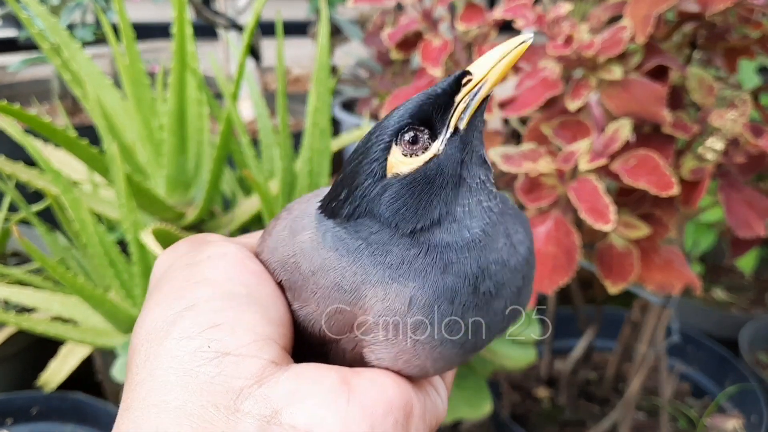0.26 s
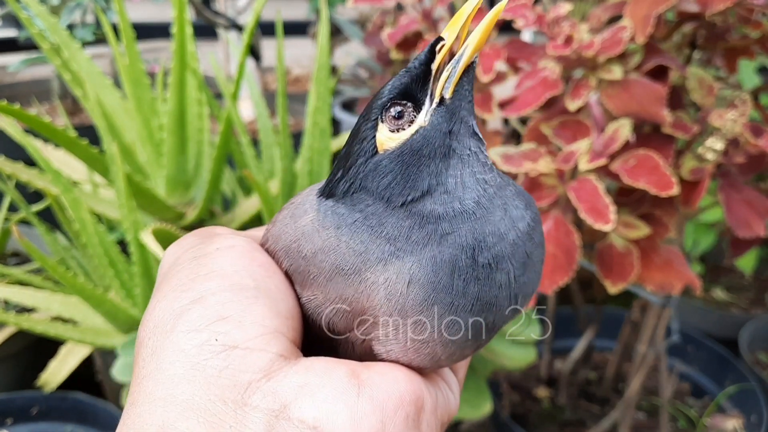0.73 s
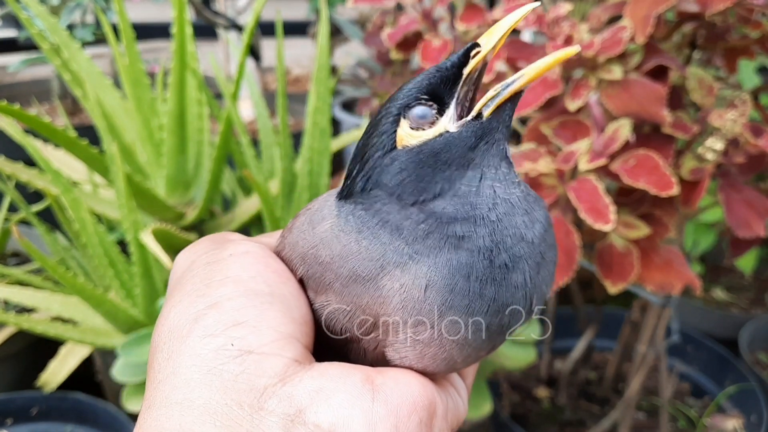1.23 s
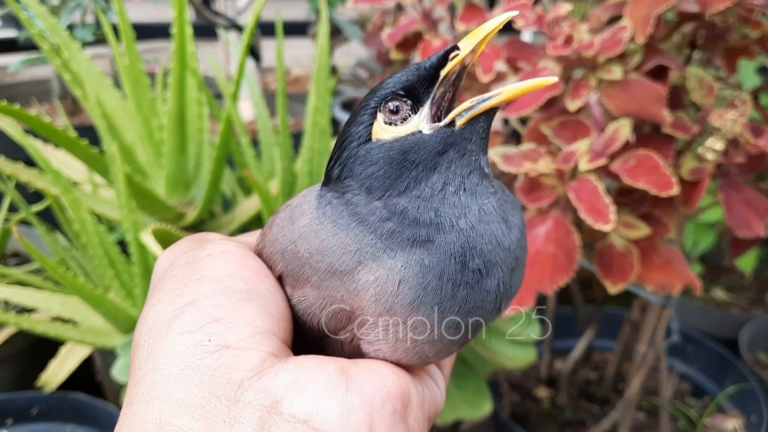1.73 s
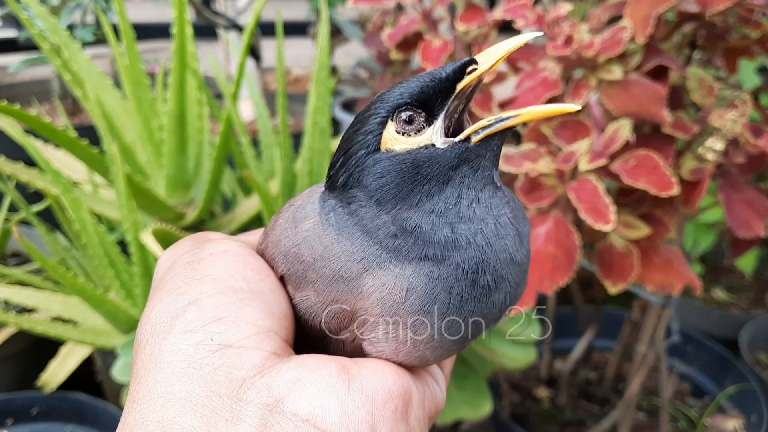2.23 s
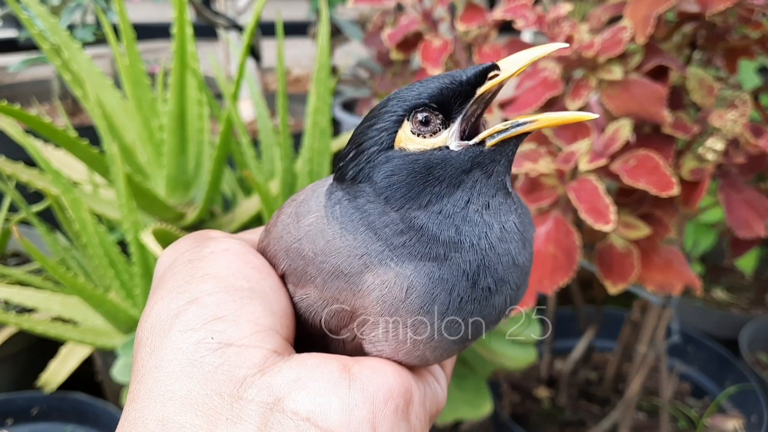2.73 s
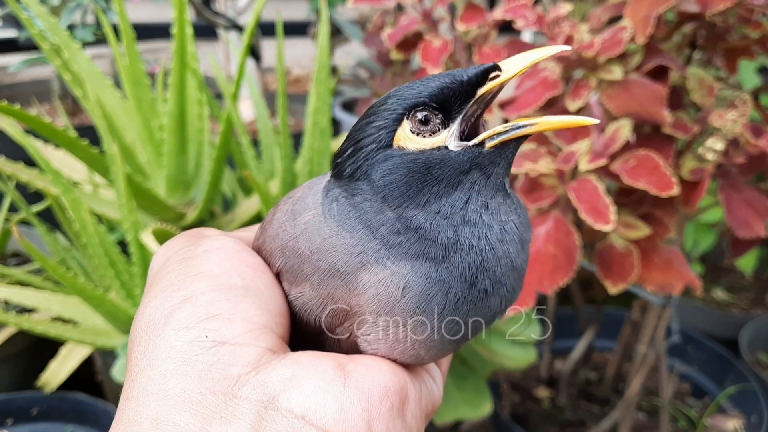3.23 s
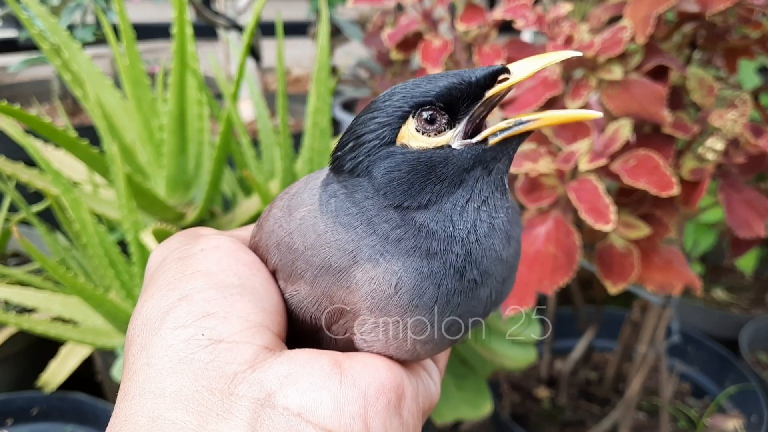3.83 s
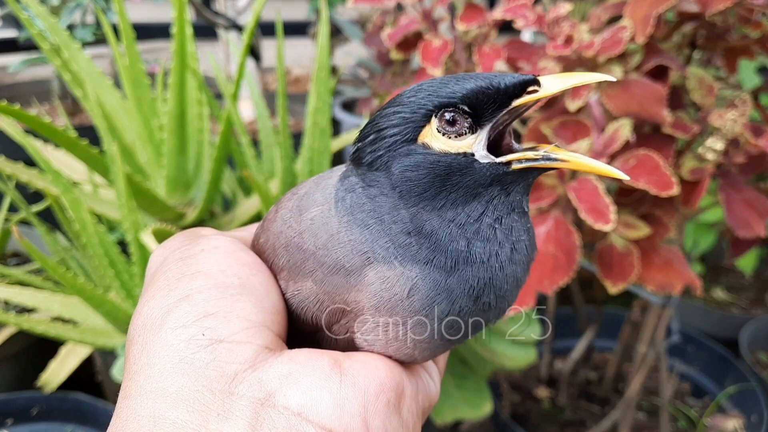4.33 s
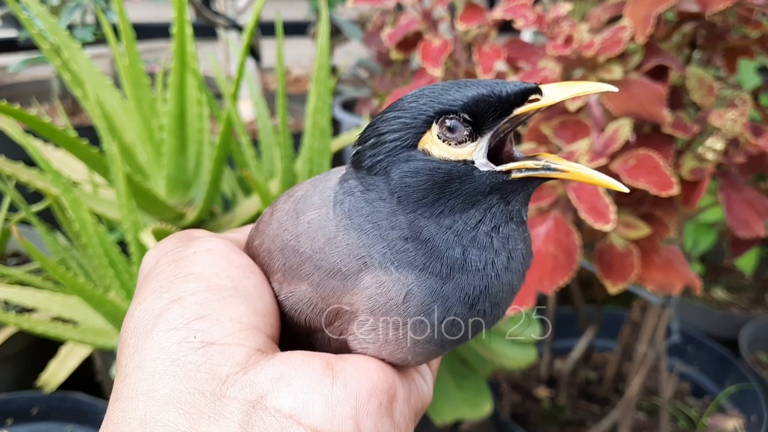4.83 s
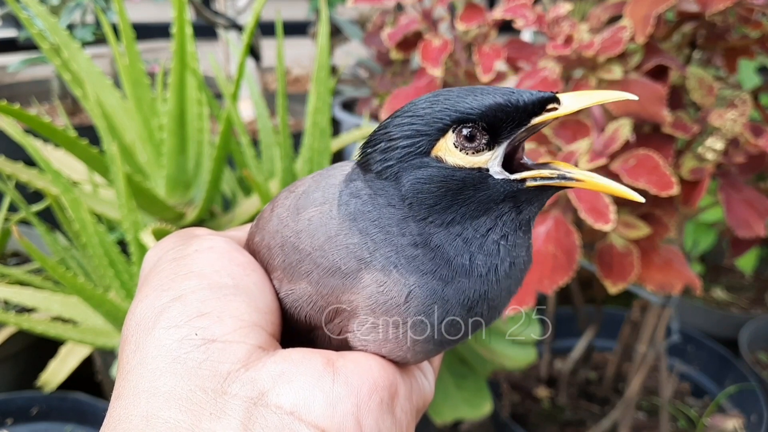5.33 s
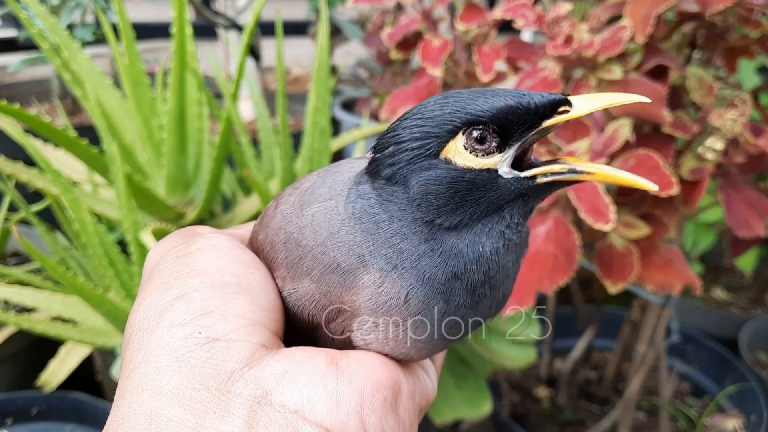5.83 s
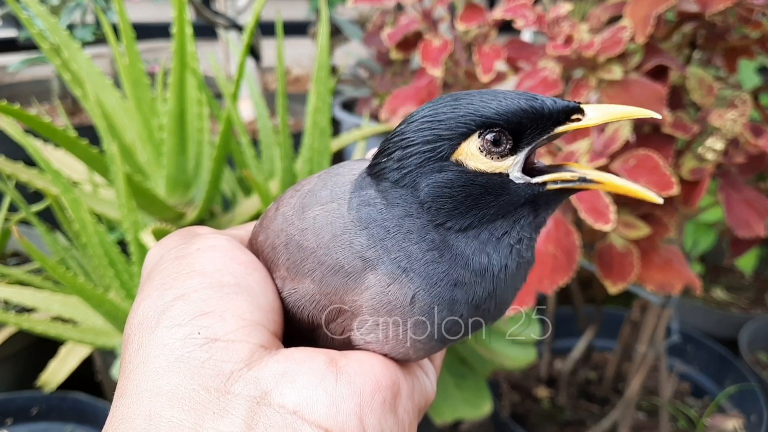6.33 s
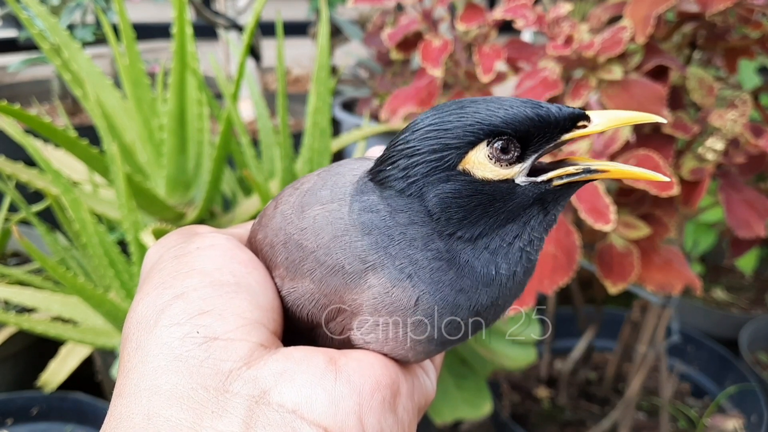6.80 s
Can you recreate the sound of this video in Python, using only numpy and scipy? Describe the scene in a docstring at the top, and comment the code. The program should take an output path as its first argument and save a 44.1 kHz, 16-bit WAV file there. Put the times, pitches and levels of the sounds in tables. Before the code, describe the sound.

A hand-held myna calls right at the microphone in a garden. After a brief tick of fingers on feathers, it gives quick squeals, croaks and warbles, then alternates triple clucks with yodel-like notes. Seven even, high peeps follow, then two lower calls and a few last slurs and clucks. Thin hisses fall between calls, over a faint rumble of distant traffic.

```python
"""A hand-held myna in a garden

The bird calls right at a phone: squeals, warbles, clucks, yodels and a run of peeps. Its syrinx, the
source, repeats a few syllable shapes; its throat, the filter, rings near 3 kHz. The sound turns rough
and hissy on fast glides. Between calls the bird hisses and whistles thinly. Fingers brush its
feathers, and walls reflect the sound faintly over a distant rumble."""
import sys
import numpy as np
from scipy import signal
from scipy.fft import rfft, irfft, next_fast_len
from scipy.io import wavfile
from scipy.ndimage import uniform_filter1d, map_coordinates

SR = 44100
rng = np.random.default_rng(int(sys.argv[2]) if len(sys.argv) > 2 else 0)


def master_out(mix):
    """Clip the mix to full scale and print it as 16-bit PCM to the path in sys.argv[1]."""
    frames = np.transpose(np.atleast_2d(mix))
    ceiling = np.clip(frames, -1, 1)
    pcm = np.round(ceiling * 32767).astype(np.int16)
    wavfile.write(sys.argv[1], SR, pcm)


N = 311346
TIME = np.arange(N) / SR


def undb(db):
    """Amplitude ratio of a level in decibels."""
    return 10 ** (np.asarray(db) / 20)


def unit(x):
    """Normalisation to rms 1."""
    return x / np.sqrt(np.mean(x ** 2) + 1e-18)


def curves(table, t):
    """Linear interpolation of a table's columns at times t."""
    times, *columns = np.transpose(table)
    return [np.interp(t, times, c) for c in columns]


def spectrum(table, hz):
    """Interpolation of a table's columns on a logarithmic frequency axis."""
    f, *columns = np.transpose(table)
    return [np.interp(np.log(hz + 1), np.log(f), c) for c in columns]


def filtered(x, response):
    """Linear filtering: the spectrum of x times a frequency response."""
    size = next_fast_len(x.shape[-1] + 4096)
    return irfft(rfft(x, size) * response(np.fft.rfftfreq(size, 1 / SR)), size)[..., :x.shape[-1]]


def resonance(f, hz, width):
    """Response of a damped resonator, gain 1 at the centre."""
    return 1j * f * width / (hz ** 2 - f ** 2 + 1j * f * width)


def noise(colour, size):
    """Gaussian noise of rms 1, shaped by (f/Hz, level/dB) points."""
    return unit(filtered(rng.standard_normal(size), lambda f: undb(spectrum(colour, f)[0])))


def wander(hz, size):
    """Random fluctuation of rms 1, low-passed at hz."""
    return unit(filtered(rng.standard_normal(size), lambda f: np.exp(-(f / hz) ** 2)))


def gate(t, length, attack, release):
    """Envelope of a linear rise and a linear fall that ends at length."""
    return np.clip(t / attack, 0, 1) * np.clip((length - t) / release, 0, 1)


def clock(length):
    """Sample times of a short event."""
    return np.arange(int(length * SR)) / SR


def add(track, start, x):
    """Superposition of x on the track from start seconds."""
    i = int(start * SR)
    track[i:i + len(x)] += x[:max(len(track) - i, 0)]


# distant traffic: t/s, level/dB
RUMBLE = [(0, -54.5), (.35, -48), (1.2, -59.5), (3.5, -60), (5.1, -59), (5.75, -69.5), (6.45, -70.5),
          (7.06, -57.5)]
# spectra of traffic and air: f/Hz, level/dB
RUMBLE_COLOUR = [(15, -24), (25, -19.5), (62, -2), (102, 0.5), (177, -4), (227, -18.5), (321, -9),
                 (419, -24), (600, -25.5), (780, -70), (1320, -120)]
AIR_COLOUR = [(300, -24.5), (800, -3), (1500, 2), (3000, -3.5), (6000, -2.5), (12000, -17.5),
              (16000, -25.5)]
# far motor: t/s, f/Hz, fundamental level/dB, octave level/dB
MOTOR = [(0, 90, -64, -65.5), (.35, 90.6, -48.5, -52.5), (1.2, 87.6, -60, -79), (2.72, 90, -55.5, -80),
         (2.87, 85.2, -77, -57), (3.65, 80.46, -53, -55), (5.3, 79.9, -78.5, -85.5),
         (7.06, 76.8, -78, -72.5)]


def garden(air_db=-70, side=.4, swell_db=3.0, swell_hz=5):
    """Ambient noise: randomly swelling traffic, two harmonics of a far motor and a faint hiss of air."""
    rumble_db = curves(RUMBLE, TIME)[0] + swell_db * wander(swell_hz, N)
    hz, fundamental_db, octave_db = curves(MOTOR, TIME)
    phase = 2 * np.pi * np.cumsum(hz * (1 + 0.018 * wander(15, N))) / SR
    motor = np.sqrt(2) * (undb(fundamental_db) * np.sin(phase) + undb(octave_db) * np.sin(2 * phase))
    rumble = noise(RUMBLE_COLOUR, N) + side * np.array([[1], [-1]]) * noise(RUMBLE_COLOUR, N)
    air = np.array([noise(AIR_COLOUR, N) for _ in range(2)])
    return undb(rumble_db) * rumble + motor + undb(air_db) * air


# fingers on feathers: t/s, duration/s, level/dB
BRUSHES = [(0.072, 1, -57.5), (0.288, 0.03, -47.5), (0.314, 0.0055, -24), (0.607, 0.022, -48)]
# their spectrum: f/Hz, level/dB
BRUSH_COLOUR = [(290, -44), (500, -17), (1950, 3), (2540, 1), (4030, 1.5), (12700, 3), (16000, 3.5)]
# hand against phone: t/s, duration/s, centre f/Hz, level/dB
BUMPS = [(0.305, 0.041, 111, -43.5), (1.771, 0.081, 110, -47.5)]


def hand():
    """Friction and impact: fingers brush the feathers, with one sharp tick, and bump the phone softly."""
    out = np.zeros(N)
    for start, length, db in BRUSHES:
        t = clock(length)
        friction = undb(db + 2 * wander(40, len(t))) * noise(BRUSH_COLOUR, len(t))
        add(out, start, friction * gate(t, length, length / 4, length / 2))
    for start, length, hz, db in BUMPS:
        t = clock(length)
        thud = filtered(rng.standard_normal(len(t)), lambda f: resonance(f, hz, 2 * hz) ** 2)
        add(out, start, undb(db) * unit(thud * gate(t, length, length / 4, length / 2)))
    return out


# hisses: t/s, duration/s, centre f/Hz, bandwidth/Hz, level/dB
HISSES = [(0.139, 0.13, 1840, 533, -43.5), (0.735, 0.13, 1930, 680, -42.5), (1.116, 0.14, 4150, 2270, -38),
          (1.509, 0.12, 4200, 2200, -41.5), (5.358, 0.3, 3570, 886, -49), (5.914, 0.086, 1836, 700, -53.5)]
# whistles on the in-breath: start t/s, end t/s, first f/Hz, last f/Hz, level/dB
WHISTLES = [(1.888, 2.03, 1260, 1200, -50.5), (2.019, 2.172, 1210, 1260, -56),
            (6.481, 6.597, 1220, 1600, -57.5), (6.791, 6.983, 1820, 1930, -42.5)]


def wheezes(skirt=0.04):
    """Flow noise: air through the open throat gives bands of hiss and thin whistles."""
    out = np.zeros(N)
    for start, length, hz, width, db in HISSES:
        t = clock(length)
        air = filtered(rng.standard_normal(len(t)),
                       lambda f: resonance(f, hz, width) * (resonance(f, hz, 2 * width) + skirt * f / hz))
        add(out, start, undb(db) * unit(air * gate(t, length, 0.0058, length * 1.6)))
    for start, end, first_hz, last_hz, db in WHISTLES:
        t = clock(end - start)
        hz = np.linspace(first_hz, last_hz, len(t)) * (1 + 0.022 * wander(60, len(t)))
        whistle = np.sin(2 * np.pi * np.cumsum(hz) / SR)
        add(out, start, undb(db) * unit(whistle * gate(t, end - start, 0.031, 0.005)))
    return out


# response of throat and beak at a gape factor of 1: f/Hz, level/dB
THROAT = [(450, -29.5), (1000, -24.5), (1400, -21), (1800, -20.5), (2200, -9), (2900, -4), (3600, -11.5),
          (4100, -23), (5000, -23.5), (6300, 1.5), (8000, -11), (10000, -2), (13000, -12), (16000, -11)]
# gape: t/s, frequency factor
GAPE = [(.8, 0.94), (1.7, 0.98), (1.81, 0.94), (2.1, 0.98), (2.7, 1.07), (4, 1.054), (5.6, 1.079),
        (6.1, 1.066), (6.6, 1.043)]


def throat_at(start):
    """Vocal tract tuning: a wider gape raises the throat's resonances."""
    gape, = curves(GAPE, start)
    return [(hz * gape, db) for hz, db in THROAT]


def roughness(hz, effort_db, glide, low_hz=2000, swell_db_per_s=300):
    """Aperiodicity: the sound turns rough and hissy on fast glides, on low notes and as it swells."""
    low = np.maximum(1 - hz / low_hz, 0)
    rise = np.maximum(np.gradient(effort_db) * SR, 0)
    building = uniform_filter1d(np.tanh(rise / swell_db_per_s), size=400)
    return 0.17 * glide + 0.26 * low + 0.092 * building


def harmonics(hz, phase, throat, slope=0.47, top_harmonic=7.0):
    """Harmonic series weighted by the throat: the body, the overtones above 5-6 kHz and their rms."""
    k = np.arange(1, 17)[:, None]
    rolloff = np.exp(-(k / top_harmonic) ** 4) / k ** slope
    weight = undb(spectrum(throat, k * hz)[0]) * rolloff * (k * hz < SR / 2)
    high = np.clip((k * hz - 5100) / 1000, 0, 1) * (k > 1)
    bands = weight * (1 - high), weight * high
    body, edge = (np.sqrt(2) * np.sum(w * np.cos(k * phase), axis=0) for w in bands)
    body_rms, edge_rms = (np.sqrt(np.sum(w ** 2, axis=0) + 1e-12) for w in bands)
    return body, edge, body_rms, edge_rms


def syllable(shape, trill, throat, length, pitch, overtones_db, rough,
             jitter=0.0046, scatter=.075, breath=0.057, support=0.49, glide_bright_db=9):
    """Source and filter: the throat weights the syrinx's harmonics, and air hisses once a cycle."""
    t = clock(length)
    hz, effort_db = curves(shape, t * shape[-1][0] / length)
    envelope = undb(effort_db) * gate(t, length, attack=.004, release=.004)
    glide = np.tanh(uniform_filter1d(np.abs(np.gradient(np.log(hz))) * SR, size=400) / 30)
    rough = rough + roughness(hz, effort_db, glide)
    if trill:  # a slow second oscillation modulates pitch and air flow together
        crest, end, rate_hz, swing, depth = trill
        held = gate(t - crest + 1 / rate_hz / 2, end - crest + 1 / rate_hz, .003, 0.0087)
        modulation = held * np.cos(2 * np.pi * rate_hz * (t - crest))
        hz = hz * (1 + swing * modulation)
        envelope = envelope * np.sqrt(1 + depth * modulation)
    hz = pitch * hz * (1 + jitter * wander(97, len(t)) + scatter * rough * wander(1400, len(t)))
    phase = 2 * np.pi * np.cumsum(hz) / SR
    body, edge, body_rms, edge_rms = harmonics(hz, phase, throat)
    flow = 1 + np.cos(phase)
    air = noise(throat, len(t)) * flow
    # the overtones are the first to fray into hiss
    fray = np.tanh(2.4 * rough)
    hiss = filtered(rng.standard_normal(len(t)) * flow, lambda f: resonance(f, 10000, 13000) ** 2)
    edge = np.sqrt(1 - fray ** 2) * edge / edge_rms + fray * unit(hiss)
    # they grow with effort and flutter a little
    bloom_db = 0.15 * (effort_db - effort_db.max()) + 2 * wander(45, len(t))
    # a note is loud and pure on the throat's resonance, thin and bright off it and on glides
    bright = undb(overtones_db + glide_bright_db * glide + bloom_db) * edge_rms / body_rms
    tone = (body / body_rms + bright * edge) / np.sqrt(1 + bright ** 2)
    shimmer = 1 + .6 * rough * wander(420, len(t))
    return envelope * body_rms ** support * (tone * shimmer + breath * rough * air)


# syllable shapes before stretching and transposition: t/s, f/Hz, effort level/dB
SQUEAL = [(0, 1472, -27), (.02, 2471, -21), (.032, 2580, -14.5), (.04, 4737, -10.5), (.074, 4890, -7),
          (.083, 3090, -4.5), (.091, 2990, -6), (.095, 1800, -8.5)]
CROAK = [(0, 1403, -22), (.012, 1129, -18.5), (.023, 1290, -26), (.035, 1195, -20)]
WARBLE = [(0, 1615, -22), (.01, 2033, -16.5), (.015, 3020, -7), (.056, 3257, -5.5), (.075, 3000, -5),
          (.088, 2875, -13.5)]
MEW = [(0, 3137, -22), (.012, 2230, -14.5), (.038, 2017, -11), (.06, 2000, -16.5), (.078, 1930, -35)]
SWEEP = [(0, 1645, -16), (.013, 2082, -18), (.02, 3014, -6.5), (.034, 4310, -14.5), (.057, 5090, -5),
         (.074, 4770, -4)]
RASP = [(0, 3400, -6), (.004, 3043, -3), (.012, 2338, -10.5), (.052, 1885, -12), (.086, 1783, -29)]
ARCH = [(0, 821, -36), (.012, 1081, -21.5), (.03, 1315, -18.5), (.035, 1640, -13), (.05, 1783, -10),
        (.085, 1877, -13.5), (.11, 1540, -14.5), (.134, 1190, -17.5), (.155, 448, -30)]
BLIP = [(0, 1435, -19.5), (.006, 1663, -13), (.014, 1610, -12), (.021, 1500, -23)]
SLUR = [(0, 2630, -19), (.009, 2780, -16), (.017, 2500, -13.5), (.037, 2492, -10.5), (.051, 2230, -20),
        (.062, 2040, -17), (.066, 1420, -21.5), (.077, 1253, -20.5), (.083, 1680, -5)]
SIGH = [(0, 3270, -10), (.014, 2457, -13), (.038, 2136, -14.5), (.056, 2000, -17.5), (.071, 1685, -48)]
YIP = [(0, 3390, -16.5), (.012, 3966, -1), (.015, 4830, -9.5), (.024, 5220, 7)]
# trills: first crest t/s, end t/s, rate/Hz, relative pitch swing, power modulation depth
PLAIN = None
SHAKE = (.0172, .063, 85, .035, .93)
RATTLE = (.009, .09, 109, .22, .35)
# single notes: shape, trill, start t/s, end t/s, pitch factor, gain/dB, overtone gain/dB, base roughness
NOTES = [ (SQUEAL, PLAIN, 0.7686, .865, 1.04, 2.6, -29, 0.062),
         (CROAK, PLAIN, .862, .897, 1.02, 0, -22, 0.16), (WARBLE, SHAKE, .897, .985, 1, 0, -23, 0.082),
         (MEW, PLAIN, .99, 1.069, .99, 0, -25, .03), (SQUEAL, PLAIN, 1.185, 1.28, 0.97, 0, -30.5, 0.034),
         (CROAK, PLAIN, 1.277, 1.314, 1, -2, -17, 0.21),
         (WARBLE, SHAKE, 1.317, 1.405, .98, 0, -22.5, 0.077),
         (MEW, PLAIN, 1.417, 1.495, 1, 0, -24.5, 0.044),
         (SQUEAL, PLAIN, 1.599, 1.692, 1.025, -.3, -24, 0.04),
         (CROAK, PLAIN, 1.689, 1.725, 1.03, 0, -28.5, .15),
         (SWEEP, PLAIN, 1.733, 1.807, 0.96, 0, -16.5, 0.088),
         (RASP, RATTLE, 1.807, 1.893, 0.94, 0, -37, .015),
         (SQUEAL, PLAIN, 2.024, 2.116, 1.01, -0.55, -23, .03),
         (CROAK, PLAIN, 2.111, 2.146, 1.03, -2, -29, .15),
         (WARBLE, SHAKE, 2.156, 2.248, 1.002, 0, -22.5, 0.013),
         (MEW, PLAIN, 2.259, 2.333, 1.015, 0, -20.5, 0.028),
         (ARCH, PLAIN, 6.03, 6.185, 1, -0.45, -13, 0.029),
         (ARCH, PLAIN, 6.29, 6.455, 1.016, -0.4, -12.5, 0.032),
         (BLIP, PLAIN, 6.577, 6.595, 0.894, -11, -28, 0.049),
         (SLUR, PLAIN, 6.596, 6.679, .99, 0, -20.5, 0.029), (BLIP, PLAIN, 6.676, 6.698, 0.97, 0, -13, .04),
         (SIGH, PLAIN, 6.698, 6.77, 0.98, 0, -19, .044), (YIP, PLAIN, 7.036, 7.062, 1, 0, -26, .05)]


def notes():
    """Frequency and amplitude modulation: the syrinx follows a few contours, stretched and transposed."""
    out = np.zeros(N)
    for shape, trill, start, end, pitch, db, overtones_db, rough in NOTES:
        note = syllable(shape, trill, throat_at(start), end - start, pitch, overtones_db, rough)
        add(out, start, undb(db) * note)
    return out


# resonances that a cluck excites: f/Hz, bandwidth/Hz, level/dB
CLUCK_MODES = [(669, 190, -7), (1463, 190, -0.5), (2060, 270, 0), (2840, 190, 11), (3240, 265, 12.5),
               (4030, 140, -23), (6500, 1100, -13), (11280, 6700, -38.5), (14770, 4700, -21.5)]


def cluck(length, hollow_db, pulse_hz=900, scatter=.3, air=0.077, mouth_hz=880, mouth_width=220):
    """Impulse excitation: quick, uneven slaps of the syrinx ring throat and mouth."""
    t = clock(0.04)
    cycles = np.cumsum(pulse_hz * np.exp(scatter * wander(670, len(t)))) / SR
    slaps = np.diff(np.floor(cycles), prepend=-1) * (t < length)
    puff = air * rng.standard_normal(len(t)) * np.exp(-np.maximum(t - length, 0) / .0035)
    modes = list(CLUCK_MODES) + [(mouth_hz, mouth_width, hollow_db)]
    ring = filtered(slaps + puff, lambda f: sum(undb(db) * resonance(f, hz, w) for hz, w, db in modes))
    return unit(ring) * np.sqrt((length + 0.0002) / t[-1])


# bursts: t/s, count, spacing/s, last duration/s, last level/dB, mouth resonance level/dB
CLUCKS = [(2.45, 3, 0.035, 0.006, -12.5, -26), (2.918, 3, 0.035, .0057, -12, -25),
          (3.3915, 3, .036, 0.0058, -11, -30), (3.868, 3, 0.036, 0.0055, -9, -30),
          (5.836, 5, .0187, 0.0015, -21.5, 3), (6.864, 3, 0.053, .0065, -13.5, 0)]


def clucks(growth=2.1, swell_db=3):
    """Pulse trains: evenly spaced clucks, each longer and louder than the one before."""
    out = np.zeros(N)
    for start, count, gap, length, db, hollow_db in CLUCKS:
        for k in range(count):
            to_go = 1 - k / (count - 1)
            pulse = cluck(length / growth ** to_go, hollow_db)
            add(out, start + k * gap, undb(db - swell_db * to_go) * pulse)
    return out


# yodel shapes before transposition: t/s, f/Hz, effort level/dB
SCOOP = [(0, 765, -40), (.021, 1166, -19), (.026, 1820, -10.5), (.036, 1841, -11.5), (.043, 1374, -13.5),
         (.047, 2187, -14.5), (.056, 1960, -15), (.063, 1318, -13.5), (.074, 1192, -21)]
PIPE = [(0, 3147, -7), (.025, 3195, -8), (.053, 3240, -7), (.058, 2670, 0)]
MOAN = [(0, 2423, -11), (.015, 2270, -18.5), (.031, 1823, -15.5), (.072, 1800, -18), (.095, 1742, -43.5)]
# parts of one yodel: shape, delay/s, overtone gain/dB, base roughness
YODEL = [(SCOOP, 0, -24.5, .02), (PIPE, .071, -19.5, .012), (MOAN, 0.13, -19.5, .03)]
# yodels: t/s, pitch factor, gain/dB
YODELS = [(2.624, 0.97, -0.7), (3.085, 0.97, -0.6), (3.563, 0.97, 2)]


def yodels():
    """Register breaks: the voice jumps from the low register to the high one and back."""
    out = np.zeros(N)
    for start, pitch, db in YODELS:
        for shape, delay, overtones_db, rough in YODEL:
            note = syllable(shape, PLAIN, throat_at(start), shape[-1][0], pitch, overtones_db, rough)
            add(out, start + delay, undb(db) * note)
    return out


# a peep's opening and close: t/s from the start of each, f/Hz, effort level/dB
HOOK = [(0, 1246, -22), (.008, 1902, -18), (.015, 2150, -13), (.021, 1390, -12.5), (.029, 1314, -12.5)]
FLICK = [(.008, 3206, -8.5), (.013, 1606, -18), (.023, 850, -23)]


def peep_shape(climb, hold, final_hz, from_hz=2560, to_hz=2785, break_s=0.0037, creep_hz_per_s=700,
               swell_s=0.027, onset_db=-12, full_db=-6, hold_db=-5.5):
    """Pitch contour: a low hook, a swelling climb, an upward break, a creeping hold and a flick."""
    leap = HOOK[-1][0] + break_s
    settled = leap + climb + break_s
    swell = min(swell_s / climb, .9)
    whistle = [(leap, from_hz, onset_db),
               (leap + swell * climb, from_hz + swell * (to_hz - from_hz), full_db),
               (leap + climb, to_hz, full_db),
               (settled, final_hz - creep_hz_per_s * hold, hold_db),
               (settled + hold, final_hz, hold_db)]
    return list(HOOK) + whistle + [(settled + hold + t, hz, db) for t, hz, db in FLICK]


# peeps: t/s, climb/s, hold/s, f/Hz at the end of the hold, gain/dB, overtone gain/dB
PEEPS = [(4.05, 0.043, .041, 2989, 1, -20), (4.268, 0.031, 0.06, 2965, .5, -18.5),
         (4.493, 0.022, 0.073, 2959, -0.5, -18), (4.728, 0.027, 0.064, 2984, -1.5, -18),
         (4.958, .022, 0.062, 3035, -1, -17), (5.185, 0.021, .06, 3000, -1.65, -19),
         (5.451, 0.04, 0.042, 2990, -3, -21)]


def peeps(rough=0.014):
    """Resonant reinforcement: each whistle climbs to the throat's peak near 3 kHz and holds there."""
    out = np.zeros(N)
    for start, climb, hold, hz, db, overtones_db in PEEPS:
        shape = peep_shape(climb, hold, hz)
        note = syllable(shape, PLAIN, throat_at(start), shape[-1][0], 1, overtones_db, rough)
        add(out, start, undb(db) * note)
    return out


# the turning head: t/s, lag at the right port/samples, level/dB of the highest treble
HEAD = [(0, 3.7, -5), (3.6, 3.5, 6), (4.4, 2.66, 2.5), (5.5, 1.82, 1.5), (6.1, 1.88, 4), (6.7, 2.13, -6),
        (7.06, 1.54, -1)]


def beamed(x, beam_hz=13500):
    """Directivity: the highest treble leaves the beak in a narrow beam that swings as the head turns."""
    _, top_db = curves(HEAD, TIME)
    top = filtered(x, lambda f: 1 / (1 + (beam_hz / (f + 1)) ** 20))
    return x + (undb(top_db) - 1) * top


# microphone ports, left relative to right: f/Hz, level/dB, phase lead/rad
PORTS = [(400, -0.5, 0.54), (1190, 3, 0.73), (1640, 3, 0.15), (1856, 10, -0.022), (2322, 12, 0.2),
         (2446, -2.5, -1.6), (2720, -0.5, -1.8), (2990, -2, -0.55), (3145, -2, -1.05), (3266, -4.5, -0.49),
         (4900, -5.5, 0.37), (6830, 6, 0.27), (8350, -2.5, -0.82), (13100, 5, -0.33)]


def ports(x):
    """Shadowing and path difference: the phone shades each port differently, and the right one lags."""
    def shade(f):
        db, lead = spectrum(PORTS, f)
        pair = np.array([undb(db) * np.exp(1j * lead), np.ones(len(f))])
        return pair * np.sqrt(2 / (1 + undb(db) ** 2))
    left, right = filtered(x, shade)
    lag, _ = curves(HEAD, TIME)
    return np.array([left, map_coordinates(right, [np.arange(N) - lag], order=3)])


# echoes of hand and phone, pots, far walls, leaves: delay/s, T60/s, centre f/Hz, bandwidth/Hz, level/dB
ECHOES = [(0.00069, 0.033, 11000, 9100, -10.5), (.004, 0.14, 3000, 16000, -15.5),
          (0.021, .55, 2200, 2200, -29), (.012, 0.29, 11000, 7000, -24)]


def reflections(x):
    """Diffuse reflection: each group of surfaces returns a decaying echo; the far walls are dullest."""
    t = clock(.7)
    response = 0
    for delay, t60, hz, width, db in ECHOES:
        decay = unit(undb(-60 * t / t60) * (t > delay)) / np.sqrt(len(t))
        tail = decay * rng.standard_normal((2, len(t)))
        response = response + undb(db) * filtered(tail, lambda f: resonance(f, hz, width))
    return signal.fftconvolve(x[None], response, axes=1)[:, :N]


def scene():
    """Superposition of the direct sound, its reflections and the garden's ambient noise."""
    voice = beamed(notes() + yodels() + peeps())
    direct = voice + clucks() + wheezes() + hand()
    return ports(direct) + reflections(direct) + garden()


def record(dry, ceiling=.9, top_hz=15900):
    """Limiting: a soft limiter rounds the very loudest peaks, and a low-pass filter cuts the top."""
    rounded = dry / (1 + (dry / ceiling) ** 12) ** (1 / 12)
    return signal.sosfilt(signal.ellip(10, .2, 80, top_hz, fs=SR, output="sos"), rounded)


dry = scene()
out = record(dry)
master_out(out)
```